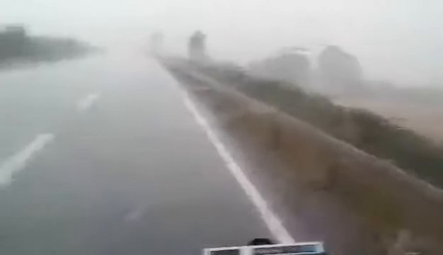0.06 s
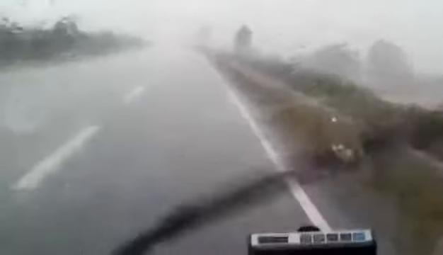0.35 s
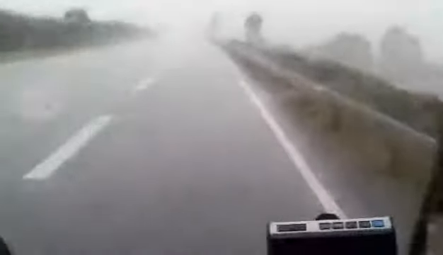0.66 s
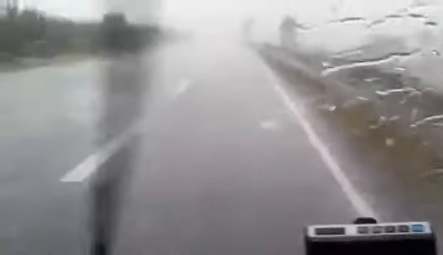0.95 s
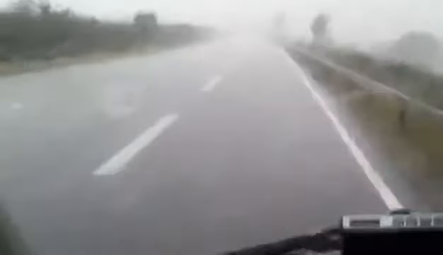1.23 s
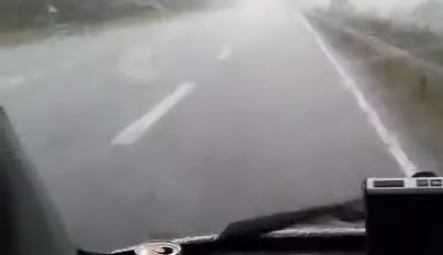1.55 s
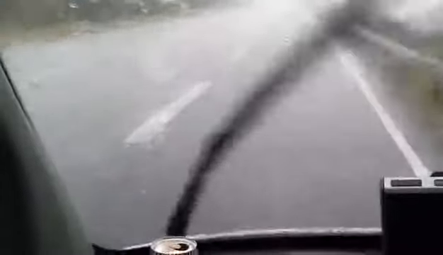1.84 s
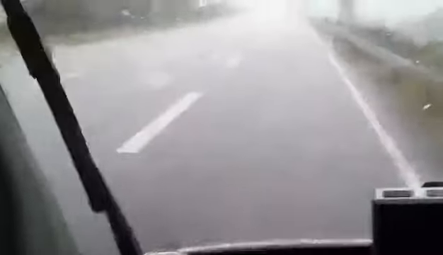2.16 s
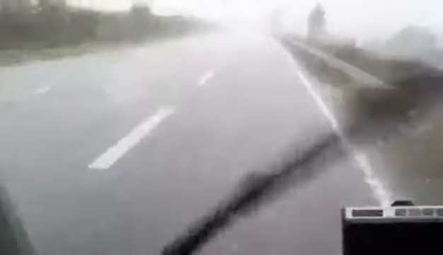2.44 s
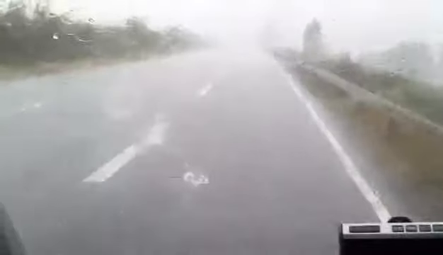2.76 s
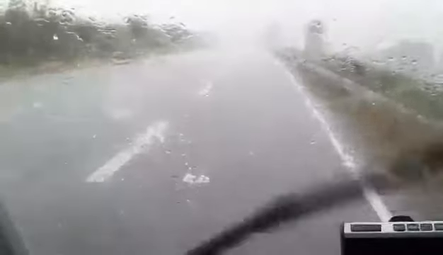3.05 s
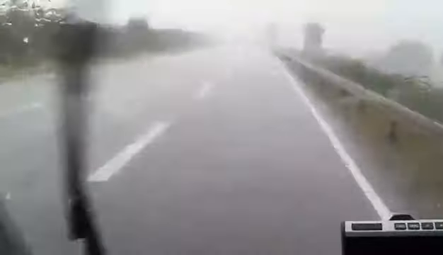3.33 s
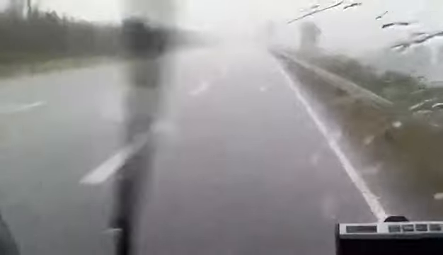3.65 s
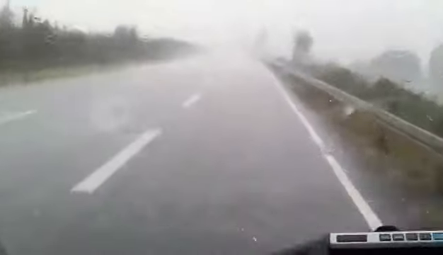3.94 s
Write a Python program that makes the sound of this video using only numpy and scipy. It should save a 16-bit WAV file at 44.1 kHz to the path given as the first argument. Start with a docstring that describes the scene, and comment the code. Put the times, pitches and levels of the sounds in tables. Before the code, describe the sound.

Heard from inside a car on a wet highway, hailstones snap loudly against the glass and knock on the roof throughout. Fine ice and rain tick between the hits, over an uneven roar of tyres and spray.

```python
"""Inside a moving car, in hail and heavy rain. Stones crack on the windshield close by, thud on the roof
and set the farther panes ringing, over a patter of small ice and the roar of tyres and spray.
Each hit is a stack of decaying noise bursts, coloured like the modes of the panel it strikes,
and everything rings through the cabin. The hard hits overload the recorder, whose gain ducks after them."""
import sys
import numpy as np
from scipy import signal
from scipy.fft import rfft, irfft, next_fast_len
from scipy.io import wavfile
from scipy.ndimage import map_coordinates

SR = 44100
rng = np.random.default_rng(int(sys.argv[2]) if len(sys.argv) > 2 else 0)


def store_wav(level_fs):
    """Save 16-bit WAV to argv[1]."""
    pcm = np.round(np.clip(np.atleast_2d(level_fs), -1, 1) * 32767)
    wavfile.write(sys.argv[1], SR, pcm.T.astype(np.int16))


N = 176400


def windshield():
    """Each stone sends a falling chirp and a snap through the glass, with a knock, a ring and a crack."""
    # stones: t/s, level/dB, knock/dB, crack/dB, ring f/Hz, t60/s, left over right/dB
    strikes = [(0.0179, -9, -17, -4.5, 3540, 0.043, -2), (0.0591, 5, -24, -9, 3430, 0.096, -1),
               (0.1532, 2, -9, -7, 3580, 0.1, -0.5), (0.2309, -3, -12, -10, 4050, 0.081, 0.5),
               (0.2378, -3, -8.5, -11, 3470, 0.058, 1), (0.2671, 0.5, -31, -7.5, 3480, 0.11, 1.0),
               (0.4607, -0.5, -27, -9, 2990, 0.088, -1), (0.6749, -3, -7, -8.5, 3000, 0.096, 1.0),
               (0.7134, -11, -5, -35, 3300, 0.12, 3.0), (0.9415, 8.5, -22, -12.5, 3540, 0.12, -2),
               (0.9812, -0.5, -12, -9, 3440, 0.089, -1.5), (1.0966, 2.5, -37, -11, 3960, 0.072, -2),
               (1.1588, -5.5, -9, -11, 3560, 0.094, -0.5), (1.2108, -4.5, -14, -11.5, 3500, 0.23, 1),
               (1.3078, 7, -18.5, -9, 2930, 0.08, -2), (1.4325, -2.5, -7.5, -7.5, 3480, 0.15, -0.5),
               (1.4388, -2, -15, -5.5, 2950, 0.2, 1), (1.4703, -4, -5.5, -13, 3470, 0.13, -1),
               (1.508, -3, -9, -9, 3220, 0.058, 0), (1.5164, -3.5, -19, -7, 3130, 0.078, -1),
               (1.5396, 0.5, -11.5, -7, 3100, 0.093, 0.5), (1.5896, -1, -30, -8.5, 3300, 0.07, 1.5),
               (1.6386, -7, -12, -7, 2960, 0.051, -1.0), (1.6875, -5.5, -23, -17, 2800, 0.13, 1.5),
               (1.8181, -8, -21, -11, 3620, 0.1, 0), (1.8475, -2, -31, -3, 3160, 0.084, 0),
               (1.8765, -3, -27, -5, 3460, 0.086, 0), (1.9086, -6, -27, -2, 3640, 0.12, 4),
               (1.9149, -0.5, -9, -7, 3900, 0.12, -1), (1.9607, -2, -22, -12, 2850, 0.17, -1),
               (2.0021, 7, -16, -10, 3580, 0.088, -1), (2.0528, -6, -21, -6, 3700, 0.085, -1),
               (2.1204, -6, -10, -8, 3140, 0.086, 0.0), (2.1287, 5, -18, -6.5, 3180, 0.082, 0.0),
               (2.1754, -4, -9.5, -6.5, 2740, 0.12, -1.5), (2.2558, -6, -14, -13, 3450, 0.23, 0),
               (2.2897, 1.5, -35, -9, 3100, 0.081, 0), (2.4111, 3.5, -8, -5, 3320, 0.066, -2),
               (2.4219, 3, -22, -10, 3040, 0.089, 0.5), (2.4307, 7.5, -30, -6.5, 3030, 0.077, 5),
               (2.454, 5, -4.5, -9.5, 3040, 0.076, -1), (2.489, 3, -22, -11, 3130, 0.13, 2),
               (2.545, -1.5, -8, -8.5, 3000, 0.086, 0), (2.6416, -0.5, -13, -4.5, 3840, 0.12, 2),
               (2.6517, 2.5, -17, -11, 2820, 0.1, 0), (2.9702, -10, -8, -7, 3520, 0.11, 3),
               (3.039, 1.5, -14, -9, 3140, 0.061, -1), (3.1452, -3.5, -9, -4.5, 3320, 0.051, -1),
               (3.1937, -6, -8.5, -8, 3330, 0.097, 0), (3.3339, -1, -6.5, -9.5, 3180, 0.13, -0.5),
               (3.4459, 0.5, -16, -12.5, 3100, 0.087, 0), (3.5488, 2.5, -27, -4.5, 3500, 0.056, 3),
               (3.5554, 2, -12.5, -15, 2920, 0.12, -1), (3.5865, -0.5, -5.5, -7.5, 3250, 0.1, 0.5),
               (3.6456, -10.5, -6, -6.5, 3500, 0.19, -0.5), (3.695, -0.5, -8, -10.5, 3400, 0.1, 0.5),
               (3.8158, -3, -14, -14, 2930, 0.14, 0.5), (3.8454, -4, -6, -17, 3330, 0.14, -1),
               (3.8799, -1.5, -8.5, -9.5, 3750, 0.089, -1), (3.906, -4, -14, -7, 3330, 0.097, -2),
               (3.9424, 7, -8, -8, 3250, 0.078, 1.0), (3.9707, 1, -9.5, -9.5, 3130, 0.12, 0.5)]
    # body of the struck glass: f/Hz, level/dB
    glass_colour = [(600, -9.5), (1300, -10.5), (2100, -4), (2700, -3), (3300, -2.5), (3800, -1.5),
                    (4500, -4.5), (6000, -13), (12000, -41)]
    # low knock: f/Hz, level/dB
    knock_colour = [(25, -50), (100, -35), (220, -9), (330, 3), (520, 1.5), (850, 5.5), (1400, -1),
                    (2400, -5.5), (6000, -50)]
    # treble crack: f/Hz, level/dB
    crack_colour = [(2000, -14.5), (3800, -3), (5000, -1.5), (7000, -0.5), (9000, -7.5), (12000, -11.5),
                    (15000, -25)]
    rise_s, chirp_hz, chirp_s = 0.00049, 6580, 0.00395
    out = np.zeros((2, N))
    for start, db, knock_db, crack_db, ring_hz, t60, pan_db in strikes:
        body = burst(glass_colour, rise_s, t60)
        snap = amp(-4.5) * burst(glass_colour, rise_s / 2, t60=0.029)  # direct sound, ahead of the echoes
        ring = amp(-5) * burst(resonance(ring_hz, width_hz=280), rise_s, t60)
        knock = amp(knock_db + 4) * burst(knock_colour, 2 * rise_s, 0.96 * t60)
        crack = amp(crack_db + 6.5) * burst(crack_colour, rise_s, 0.77 * t60)
        # bending waves: the treble arrives first; the sweep varies by stone and by channel
        t = np.arange(body.shape[1]) / SR
        travel = np.exp(0.3 * rng.standard_normal((2, 1)))
        pitch = np.exp(0.15 * rng.standard_normal((2, 1)))
        phase = 2 * np.pi * chirp_hz * pitch * t / (1 + t / (chirp_s * travel))
        chirp = amp(-0.5) * np.sin(phase) * fade(t, rise_s / 2, t60=0.013)
        hit = body + snap + ring + knock + crack + chirp
        pan = amp([[pan_db / 2], [-pan_db / 2]])
        add(out, start, amp(db - 4) * hit * pan)
    return out


def roof():
    """Dull blows on the lined sheet metal; each spot has its own knock and boom."""
    # stones: t/s, level/dB, boom/dB, knock f/Hz, boom f/Hz, t60/s
    thuds = [(0.001, -13, -1, 855, 400, 0.12), (0.291, -12, 0, 964, 355, 0.13),
             (0.587, -10.5, 1, 846, 340, 0.22), (0.638, -3.5, -1, 994, 305, 0.079),
             (0.811, -1, -12, 833, 338, 0.11), (1.043, 4.5, -5, 740, 440, 0.12),
             (1.051, -1.5, 1.5, 860, 312, 0.12), (1.7, -11, -4, 1030, 386, 0.31),
             (1.924, -12.5, 0.5, 1220, 412, 0.19), (2.024, -7, 0, 756, 464, 0.12),
             (2.221, -5.5, 7, 786, 377, 0.15), (2.242, -2, 5.5, 795, 366, 0.077),
             (2.343, -10.5, -3, 789, 338, 0.18), (2.414, 4, -5, 1105, 300, 0.13),
             (2.453, -5.5, -0.5, 745, 493, 0.15), (2.647, 3.5, -12, 890, 302, 0.069),
             (2.833, -3.5, -3, 954, 324, 0.17), (2.851, 8.5, 0, 850, 340, 0.1),
             (3.013, -10, 2.5, 864, 340, 0.1), (3.086, -5.5, 1, 855, 360, 0.14),
             (3.199, -7.5, 0, 710, 400, 0.34), (3.297, -5, -6, 806, 346, 0.13),
             (3.337, 1.5, -9, 785, 320, 0.072), (3.449, -7, 2, 892, 317, 0.16),
             (3.63, -6.5, -5.5, 767, 325, 0.14), (3.824, 0, -2, 1263, 347, 0.13),
             (3.909, -1, -12, 1096, 303, 0.1)]
    # knock through the lining: f/Hz, level/dB
    knock_colour = [(100, -27), (400, -19), (650, -4.5), (830, -1), (1200, -2), (1700, -6.5), (3200, -13.5),
                    (6000, -22), (12000, -57)]
    # boom of the sheet: f/Hz, level/dB
    boom_colour = [(25, -10), (90, -13), (180, -12.5), (260, -9), (325, -8.5), (400, -3.5), (520, -1),
                   (900, -35), (3000, -57)]
    rise_s = 0.0013
    out = np.zeros((2, N))
    for start, db, boom_db, knock_hz, boom_hz, t60 in thuds:
        knock = burst(knock_colour, rise_s, t60)
        knock += amp(-4.5) * burst(resonance(knock_hz, width_hz=77), rise_s, t60)
        boom = amp(-4.5) * burst(boom_colour, 2 * rise_s, 1.2 * t60)
        boom += amp(-7.5) * burst(resonance(boom_hz, width_hz=70), 2 * rise_s, 1.42 * t60)
        add(out, start, amp(db - 6.5) * (knock + amp(boom_db) * boom))
    return out


def far_panes():
    """Farther hits swell into a beating glassy ring with a splash of ice."""
    # bursting stones: t/s, level/dB, splash/dB, rise/s, t60/s
    hits = [(0.0144, -14, -20, 0.0083, 0.25), (0.0944, -8.5, -3.5, 0.0085, 0.4),
            (0.1244, -9, -12, 0.009, 0.43), (0.1844, -8, -10, 0.009, 0.22),
            (0.2269, -1.5, -5, 0.0056, 0.14), (0.3604, 3, -3, 0.0063, 0.2),
            (0.3802, -2.5, 0.5, 0.009, 0.22), (0.4044, -9.5, 5, 0.009, 0.2), (0.5841, -11, 3, 0.0074, 0.18),
            (0.7508, -1, -5, 0.007, 0.23), (0.8674, -6, -3.5, 0.0085, 0.46), (0.9044, -9.5, 2, 0.009, 0.34),
            (1.0194, -11.5, -10, 0.011, 0.34), (1.2201, -4.5, -1, 0.0054, 0.16),
            (1.2444, -10, -5, 0.0082, 0.25), (1.3414, -6, -8, 0.009, 0.35), (1.4591, -2.5, -3, 0.009, 0.2),
            (1.4894, -6, -5, 0.009, 0.16), (1.7404, -12, -0.5, 0.0072, 0.75),
            (2.0744, -11, -19, 0.009, 0.34), (2.1994, -9.5, 1, 0.012, 0.41),
            (2.2614, -6.5, 4.5, 0.009, 0.1), (2.3544, -19, -15, 0.009, 0.25),
            (2.582, -15, 7.5, 0.009, 0.31), (2.6814, 1.5, -13, 0.0039, 0.18), (2.7277, -3, -4, 0.0076, 0.2),
            (2.9023, -3, -1, 0.0057, 0.17), (2.9387, -28, -7, 0.0074, 0.16),
            (3.1174, -3.5, -11, 0.007, 0.23), (3.1344, -12, -13, 0.009, 0.14),
            (3.2844, -5.5, 0.5, 0.0063, 0.2), (3.3744, -4.5, -0.5, 0.008, 0.14),
            (3.5365, -3.5, -1.5, 0.009, 0.23), (3.7414, -3, -8, 0.0059, 0.14)]
    # mode clusters in which the windows sing: f/Hz, width/Hz, level/dB
    pane_modes = [(3420, 100, -5), (3550, 100, -1), (3450, 750, 1.5)]
    # splash of ice: f/Hz, level/dB
    splash_colour = [(500, -17), (1400, 3), (2200, 0), (3200, -3), (4600, 2), (5600, -4.5), (7200, -1),
                     (8600, 0.5), (10500, -7.5), (14000, -46)]

    def pane_colour(hz):
        return sum(amp(db) * resonance(centre, width)(hz) for centre, width, db in pane_modes)

    out = np.zeros((2, N))
    for start, db, splash_db, rise_s, t60 in hits:
        ring = burst(pane_colour, rise_s, t60)
        splash = amp(splash_db) * burst(splash_colour, rise_s, t60)
        add(out, start, amp(db - 6) * (ring + splash))
    return out


def body_pings():
    """Now and then a part of the car body clinks or hums on in a narrow band after a hit."""
    # ringing parts: t/s, level/dB, f/Hz, width/Hz, t60/s
    pings = [(2.272, -9, 2100, 110, 0.31), (2.915, -24.5, 1080, 25, 0.47), (3.266, -23, 112, 25, 0.23)]
    out = np.zeros((2, N))
    for start, db, centre_hz, width_hz, t60 in pings:
        add(out, start, amp(db) * burst(resonance(centre_hz, width_hz), rise_s=0.0053, t60=t60))
    return out


def patter(spots=12, drops_per_s=220, spread_db=6.5):
    """Small ice and big drops tick at random on several spots of the glass, over a wash of rain."""
    # swells of the shower: t/s, level/dB
    shower = [(0.0, -25.5), (0.29, -14.5), (0.4, -20), (0.71, -18), (0.82, -22), (1.02, -14), (1.12, -18.5),
              (1.26, -12.5), (1.4, -19), (1.54, -19), (1.98, -16.5), (2.56, -12.5), (2.94, -14),
              (3.27, -16), (3.41, -19.5), (3.58, -19), (3.8, -16.5), (4.0, -20.5)]
    # bright tone of ticks and wash: f/Hz, level/dB
    colour = [(300, -39), (1000, -13), (1600, -4), (2300, -2), (3000, 1), (3450, 3), (4000, 1.5),
              (5200, -6), (7200, -4.5), (9000, -8), (11500, -17), (14000, -47)]
    ticks = np.zeros((2, N))
    for _ in range(spots):
        lands = rng.random(N) < drops_per_s / spots / SR
        drops = lands * amp(spread_db * np.clip(rng.standard_normal(N), -2, 2))
        tick = burst(colour, rise_s=0.00041, t60=0.062)
        ticks += signal.oaconvolve(drops[None], tick, axes=1)[:, :N]
    wash = cabin_noise(colour, size=N)
    return level(shower) * (amp(-2.5) * unit(ticks) + amp(-6.5) * wash)


def road_roar(flutters_per_s=40, flutter_db=2.8):
    """Tyres, spray and rain drumming on the body make an uneven roar."""
    # swells of the roar: t/s, level/dB
    swells = [(0.0, -22.5), (0.53, -22.5), (0.66, -25.5), (1.53, -27.5), (1.67, -24.5), (2.1, -26),
              (2.25, -19), (2.36, -26.5), (2.58, -21.5), (3.16, -24), (3.42, -29), (3.61, -23),
              (3.77, -23.5), (4.0, -33)]
    # dark tone of the roar: f/Hz, level/dB
    colour = [(25, -34), (60, -26), (110, -5.5), (170, -6.5), (270, -1), (325, -1.5), (400, 0.5),
              (600, -3.5), (820, 0.5), (1050, -5.5), (1400, -9), (2500, -8), (6000, -48)]
    position = np.arange(N) * flutters_per_s / SR
    flutter = map_coordinates(rng.standard_normal(N // 100), [position], mode="mirror")  # smooth wobble
    roar = cabin_noise(colour, size=N) * amp(flutter_db * flutter)
    return level(swells) * unit(roar)


def cabin(x):
    """The closed cabin rings on at a few frequencies, whatever excites it."""
    # cabin resonances: f/Hz, width/Hz, level/dB
    modes = [(324, 30, -2), (984, 45, -7), (3417, 80, -9), (3540, 80, -10)]
    size = next_fast_len(N + SR // 2)
    hz = np.fft.rfftfreq(size, 1 / SR)
    ringing = sum(amp(db) * 1j * hz * width / (centre ** 2 - hz ** 2 + 1j * hz * width)
                  for centre, width, db in modes)
    return irfft(rfft(x, size) * (1 + ringing), size)[:, :N]


def cabin_noise(colour, size):
    """Diffuse stereo noise of rms 1; colour is (f/Hz, level/dB) points or a gain function."""
    # stereo width in the cabin: f/Hz, left-right correlation
    likeness = [(40, -0.59), (130, 0.39), (300, 0.9), (480, 0.73), (760, 0.65), (1150, -0.12),
                (2000, -0.078), (3300, 0), (15000, 0.021)]
    # stereo balance: f/Hz, left over right/dB
    balance = [(60, 1), (300, 4.5), (700, 2.2), (2000, 4.5), (3500, 4.5), (5200, -3), (9000, -3.5),
               (15000, 3)]
    hz = np.fft.rfftfreq(size, 1 / SR)
    gain = colour(hz) if callable(colour) else amp(along(colour, hz))
    width_angle = np.arccos(np.clip(along(likeness, hz), -1, 1)) / 2
    spectra = rfft(rng.standard_normal((2, size))) * gain
    mid, side = spectra * [np.cos(width_angle), np.sin(width_angle)]
    lean = amp(along(balance, hz) / 2)
    return unit(irfft(np.array([(mid + side) * lean, (mid - side) / lean]), size))


def burst(colour, rise_s, t60):
    """The dense modes of a struck panel, dying away."""
    ring = cabin_noise(colour, size=8192)
    return ring * fade(np.arange(ring.shape[1]) / SR, rise_s, t60)


def resonance(centre_hz, width_hz):
    """Gain function of a narrow cluster of modes."""
    return lambda hz: 1 / (1 + (2 * (hz - centre_hz) / width_hz) ** 2)


def fade(t, rise_s, t60):
    """Quick attack, then a decay of 60 dB in t60 seconds."""
    return (1 - np.exp(-t / rise_s)) * np.exp(-np.log(1000) * t / t60)


def along(points, hz):
    """Curve through (f/Hz, value) points on a log frequency axis."""
    point_hz, values = np.transpose(points)
    return np.interp(np.log(hz + 1), np.log(point_hz + 1), values)


def level(points):
    """Fader ride: gain per sample from (t/s, level/dB) points."""
    return amp(np.interp(np.arange(N) / SR, *np.transpose(points)))


def amp(db):
    """Decibels to gain."""
    return 10 ** (np.asarray(db) / 20)


def unit(x):
    """Scale to rms 1."""
    return x / np.sqrt(np.mean(x ** 2) + 1e-20)


def add(out, start_s, sound):
    """Mix a sound in at its start time."""
    part = out[:, max(0, round(start_s * SR)):][:, :sound.shape[1]]
    part += sound[:, :part.shape[1]]


def scene():
    """Hail, rain and road, all heard through the cabin."""
    return cabin(windshield() + roof() + far_panes() + body_pings() + patter() + road_roar())


def record(dry):
    """Slow gain control, clipping of what gets past it, a low cut and a steep high cut."""
    duck_above_db, duck_slope, duck_s = -14.5, 0.36, 0.18
    clip_hardness, low_cut_hz, high_cut_hz = 24, 210, 15200
    pole = np.exp(-1 / (duck_s * SR))
    power = signal.lfilter([1 - pole], [1, -pole], np.mean(dry ** 2, axis=0))
    duck = (1 + power / amp(duck_above_db) ** 2) ** (-duck_slope / 2)
    driven = dry * duck * amp(2.5)
    clipped = driven / (1 + np.abs(driven) ** clip_hardness) ** (1 / clip_hardness)
    hz = np.fft.rfftfreq(N, 1 / SR)
    low_cut = np.sqrt(hz / (hz + low_cut_hz))
    high_cut = 1 / (1 + (hz / high_cut_hz) ** 80)
    return irfft(rfft(clipped) * low_cut * high_cut, N)


dry = scene()
out = record(dry)
store_wav(out)
```